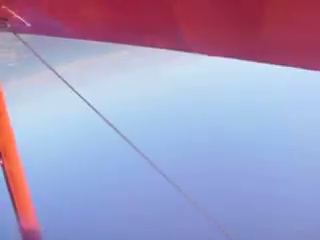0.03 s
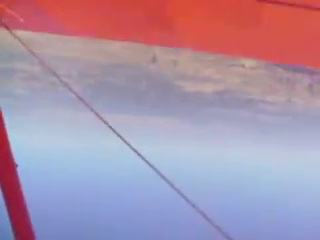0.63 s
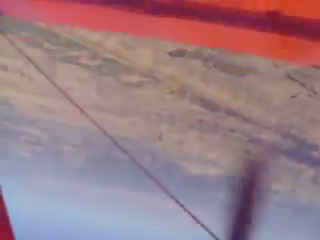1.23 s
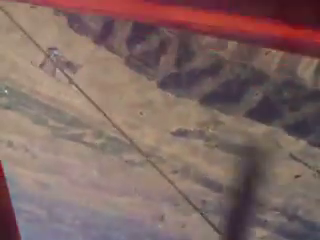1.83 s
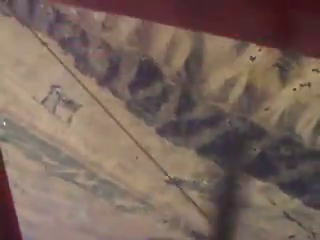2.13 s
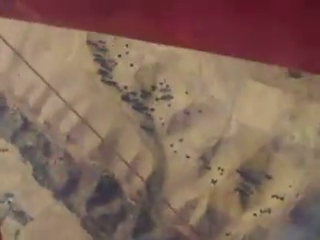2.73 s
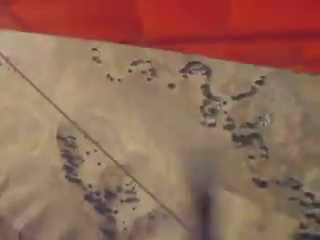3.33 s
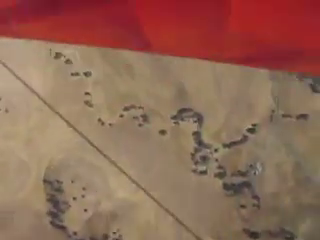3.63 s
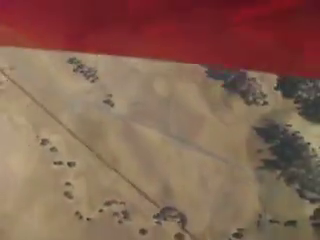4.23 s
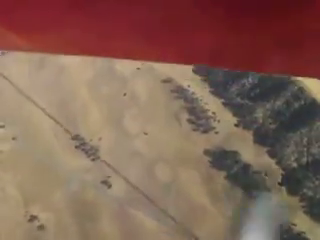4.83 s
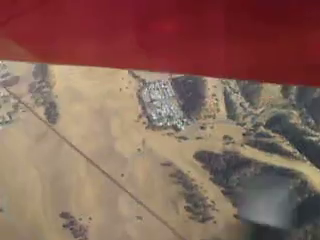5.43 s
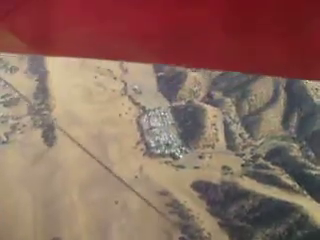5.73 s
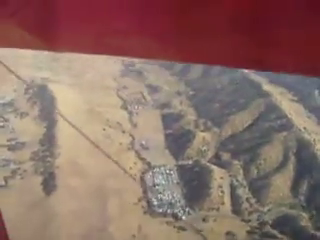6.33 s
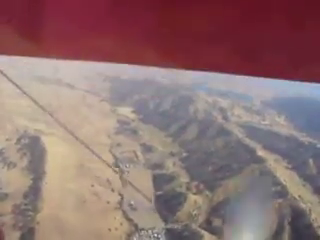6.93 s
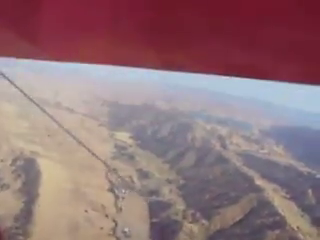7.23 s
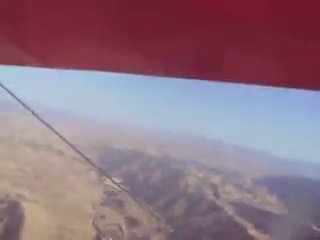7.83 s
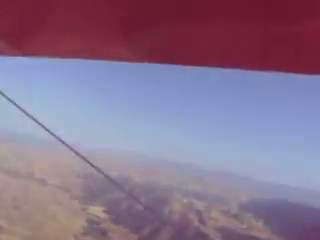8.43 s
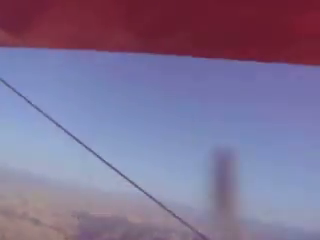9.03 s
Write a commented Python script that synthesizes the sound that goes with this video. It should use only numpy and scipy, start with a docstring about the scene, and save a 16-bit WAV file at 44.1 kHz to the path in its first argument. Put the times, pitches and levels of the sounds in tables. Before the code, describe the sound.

Loud wind roars across a small microphone in the open cockpit of a diving biplane. It comes in rapid, uneven gusts, about ten a second, each swelling into a crackling, overloaded thump before the sound briefly ducks. A piston engine drones underneath at a nearly steady pitch. As the plane gathers speed, the wind grows fuller and brighter and the exhaust rasp sinks into it.

```python
"""Wind roars and thumps on a small microphone, about ten gusts a second, in a diving open-cockpit biplane.
Each gust swells until it crackles and overloads with a thump; then the sound ducks and recovers.
The piston engine drones underneath, its exhaust rasp sinking into a slipstream that pulses
at the firing rate and brightens with airspeed."""
import sys
import numpy as np
from scipy.fft import rfft, irfft, next_fast_len
from scipy.io import wavfile
from scipy.ndimage import uniform_filter1d, map_coordinates

SR = 44100
rng = np.random.default_rng(int(sys.argv[2]) if len(sys.argv) > 2 else 0)


def file_out(sig):
    """Save sig as 16-bit WAV at sys.argv[1]."""
    # one column per channel
    cols = np.atleast_2d(sig).T
    # limit, then scale
    lim = np.clip(cols, -1, 1)
    pcm = np.round(lim * 32767).astype(np.int16)
    wavfile.write(sys.argv[1], SR, pcm)


N = 401310

# Dive, 0 = over the top, 1 = pulling out: (time [s], airspeed [0..1])
AIRSPEED = [(0, 0.32), (1.8, 0.016), (2.8, 0.2), (5.2, 0.54), (6.5, 0.79), (7.8, 1), (9.1, 0.93)]
# Crankshaft: (time [s], speed [rev/s])
SHAFT_RPS = [(1.7, 40.3), (2.4, 41.6), (3.1, 41.2), (6.6, 41.65), (8.7, 39.9)]
# Drone tones: (time [s], relative level [dB])
FIRING_DB = [(.3, -2), (.8, -5), (1.4, 1.5), (2.9, -7), (3.8, -4), (4.8, -2.5), (5.8, -7.5), (7.4, -9),
             (8.8, -11.5)]
OCTAVE_DB = [(.3, -3), (.9, -1.5), (1.4, -3.5), (1.9, -10), (3, -12), (3.8, -4.5), (4.4, -12.5), (5.8, -2),
             (6.8, -8), (8.8, -20.5)]
ORDER_5_DB = [(0, -27.5), (6.599, -27), (8.4, -7.5), (9.1, -11)]
ORDER_6_DB = [(.3, -20.5), (1.3, -1.5), (1.9, -13.5), (3.6, -20.5), (4.6, -12), (5.7, -18.5), (7.3, -10.5),
              (9.1, -12.5)]
WHINE_DB = [(.3, -13), (1.5, -8), (2.201, -16.5), (9.1, -24)]
# Exhaust overtones: (shaft order, relative level [dB])
RASP_ORDERS_DB = [(7, -6), (8, 1.5), (9, -1.5), (10, -3.5), (12, -6), (14, -7), (15, -2.5), (16.5, -9),
                  (18, -6), (20, -6.5)]
# Wind spectra: (frequency [Hz], relative density [dB])
RUMBLE_SPECTRUM_DB = [(10, -25), (25, -18.5), (50, -9), (120, 1.5), (170, -2), (260, -16.5), (600, -56.5)]
BOOM_SPECTRUM_DB = [(70, -31.5), (150, -5.5), (215, 1.5), (300, -2.5), (400, -3.5), (500, -5.5), (700, -23),
                    (2000, -62)]
RUSH_SPECTRUM_DB = [(200, -25), (400, -12.5), (530, -3.5), (620, 1.5), (680, 0.5), (750, -0.5), (850, -0.2),
                    (1000, -4.5), (1300, -11.5), (1800, -28.5), (4000, -63.5)]
HISS_SPECTRUM_DB = [(700, -31.5), (1300, 4.5), (1700, 0.7), (2100, 1), (2500, 2), (2750, 1.5), (2900, 3.5),
                    (3050, 0), (3400, -4.5), (3900, -4.5), (4500, -13.5)]
# Wind layers: (time [s], relative level [dB])
RUMBLE_DB = [(.3, -30.5), (1.8, -15), (2.3, -3.5), (2.9, -9), (3.8, -18), (4.3, -9), (5.5, -19.5),
             (7.2, -16), (9.1, -15.5)]
RUSH_DB = [(0, -6), (1.7, -6), (3.2, -3.7), (4.6, -4.5), (5.8, -5), (6.8, -4.5), (9.1, -4.5)]
# Gusts: (thump time [s], thump height [0..1], hold before thump [s], relative top level [dB])
GUSTS = [(0.1604, 0.52, 0.0035, -13.5), (0.2107, 0.9, 0.017, -15.5), (0.3085, 0.93, 0.0, -9),
         (0.4286, 0.93, 0.021, -14), (0.5404, 0.78, 0.0031, -16), (0.6257, 0.94, 0.006, -12),
         (0.7487, 0.94, 0.018, -14), (0.8715, 0.78, 0.0059, -13.5), (0.945, 0.54, 0.026, -14),
         (1.0317, 0.94, 0.022, -12.5), (1.153, 0.93, 0.0049, -11.0), (1.2763, 0.94, 0.011, -17),
         (1.3984, 0.83, 0.0053, -13.5), (1.497, 0.92, 0.0059, -17), (1.5957, 0.94, 0, -13.5),
         (1.706, 0.94, 0.0059, -10.5), (1.8287, 0.64, 0.0013, -10), (1.9155, 0.66, 0.018, -16),
         (1.989, 0.41, 0.0042, -14.5), (2.0617, 0.75, 0.004, -10.5), (2.1364, 0.83, 0.011, -15.5),
         (2.2457, 0.67, 0.018, -14), (2.3187, 0.61, 0.013, -15), (2.4029, 0.99, 0.022, -14.0),
         (2.56, 0.94, 0.041, -14.5), (2.6586, 0.86, 0.0011, -10), (2.7435, 0.6, 0.018, -14),
         (2.7757, 0.8, 0.02, -14), (2.8539, 0.61, 0.0045, -10.5), (2.898, 0.57, 0.016, -12.5),
         (2.9844, 0.68, 0.038, -16), (3.021, 0.73, 0.012, -12.5), (3.1145, 0.65, 0.023, -13.5),
         (3.1537, 0.7, 0.019, -18.5), (3.2227, 0.93, 0.011, -12), (3.3304, 0.92, 0.01, -14),
         (3.4255, 0.94, 0.025, -14), (3.535, 0.69, 0.006, -13.0), (3.6046, 0.68, 0.051, -16),
         (3.653, 0.79, 0.019, -17), (3.7246, 0.63, 0.0, -9.5), (3.808, 0.94, 0.012, -11.5),
         (3.894, 0.52, 0.0081, -13), (3.9406, 0.47, 0.012, -17.5), (3.9862, 0.46, 0.0, -10.5),
         (4.049, 0.47, 0.028, -17), (4.095, 0.93, 0.034, -16.5), (4.1761, 0.94, 0.0066, -13.5),
         (4.2882, 0.93, 0, -10.5), (4.3748, 0.63, 0.011, -13.5), (4.4675, 0.93, 0.037, -15.5),
         (4.5633, 0.65, 0.0063, -13), (4.638, 0.55, 0.018, -18.0), (4.6856, 0.72, 0.019, -14),
         (4.7685, 0.6, 0.0063, -12.5), (4.8534, 0.79, 0.012, -13.0), (4.9295, 0.14, 0.02, -17.5),
         (4.9834, 0.74, 0.04, -16.5), (5.0545, 0.61, 0.0, -10.5), (5.1087, 0.58, 0.047, -15.5),
         (5.1742, 0.75, 0.016, -14.0), (5.2834, 0.94, 0.016, -13), (5.4397, 1, 0.05, -13.5),
         (5.5203, 0.66, 0.0044, -15.5), (5.6058, 0.78, 0.048, -15.5), (5.676, 0.94, 0.016, -15),
         (5.7978, 0.76, 0.0085, -14.5), (5.861, 0.55, 0.016, -12.5), (5.942, 0.93, 0.026, -14),
         (6.039, 0.83, 0.0037, -11), (6.17, 0.94, 0.035, -15.5), (6.2703, 0.87, 0.002, -14.0),
         (6.3743, 0.62, 0.026, -15.5), (6.4163, 0.45, 0.006, -15), (6.483, 0.93, 0.03, -13),
         (6.5935, 0.6, 0.028, -14.0), (6.6388, 0.8, 0.03, -13), (6.8217, 0.58, 0.13, -14.5),
         (6.8908, 0.87, 0.058, -14.5), (6.9992, 0.7, 0.023, -14), (7.0618, 0.94, 0.011, -12.5),
         (7.181, 0.56, 0.012, -13.5), (7.2293, 0.28, 0.015, -11.5), (7.2634, 0.64, 0.0084, -16.5),
         (7.339, 0.92, 0.019, -12.5), (7.4606, 0.36, 0.039, -14), (7.506, 0.74, 0.016, -10.5),
         (7.585, 0.44, 0.014, -15), (7.7019, 0.83, 0.108, -14.5), (7.7822, 0.75, 0, -14.5),
         (7.8424, 0.61, 0.046, -12.5), (7.899, 0.7, 0.0091, -12.5), (7.956, 0.48, 0.008, -17.0),
         (7.9854, 0.97, 0.022, -11), (8.1556, 0.77, 0.0057, -9.5), (8.217, 0.74, 0.0083, -13.5),
         (8.3173, 0.56, 0.028, -13.5), (8.3766, 0.84, 0.048, -12), (8.499, 0.69, 0.048, -13.5),
         (8.567, 0.73, 0.0037, -16.0), (8.6523, 0.58, 0.064, -15), (8.7152, 0.91, 0.048, -16.5),
         (8.812, 0.89, 0.038, -13), (8.8634, 0.3, 0.0, -23.5), (8.9692, 0.85, 0.068, -12),
         (9.0546, 0.52, 0.0044, -13.0), (9.11, 0, 0.016, -8)]
# Stage after the clipper: (frequency [Hz], gain [dB])
OUTPUT_RESPONSE_DB = [(20, -3), (50, -3.5), (80, -0.5), (4300, 0.5), (5000, -7), (6300, -5), (8000, 0),
                      (10000, -5.5), (13000, -6.5), (16000, -3)]

# (level at airspeed 0 [dB], level at airspeed 1 [dB])
RASP_DB, HISS_DB = (-13, -22.5), (-17, -11)
BOOM_DB = (-4.2, 0.4)  # relative to the rush
LULL_DB = (-25.5, -18.5)  # roar between gusts, before ducking

START_S = .072
TIME_S = np.arange(N) / SR


def amp(db):
    """Decibels to gain."""
    return 10 ** (np.asarray(db) / 20)


def unit(x):
    """Scale to rms 1."""
    return x / np.sqrt(np.mean(x ** 2) + 1e-20)


def curve(rows):
    """(time [s], value) rows to one value per sample."""
    return np.interp(TIME_S, *np.transpose(rows))


def with_airspeed(levels_db):
    """Slow-to-fast level blend along the dive."""
    slow_db, fast_db = levels_db
    return slow_db + (fast_db - slow_db) * curve(AIRSPEED)


def wobble(rate_hz):
    """Smooth random curve, rate_hz knots a second."""
    knots = rng.standard_normal(int(N * rate_hz / SR) + 4)
    return map_coordinates(knots, [np.arange(N) * rate_hz / SR])


def filtered(x, response):
    """Zero-phase filter with gain response(hz)."""
    size = next_fast_len(N + 8192)
    return irfft(rfft(x, size) * response(np.fft.rfftfreq(size, 1 / SR)), size)[:N]


def colour(x, spectrum):
    """Shape x by (frequency [Hz], gain [dB]) points on a log-frequency axis."""
    points_hz, db = np.transpose(spectrum)
    return filtered(x, lambda hz: amp(np.interp(np.log(hz + 1), np.log(points_hz), db)))


def noise(spectrum):
    """Coloured noise, rms 1."""
    return unit(colour(rng.standard_normal(N), spectrum))


def gust_index():
    """Per sample, the row of the gust building up."""
    thump_s = np.transpose(GUSTS)[0]
    return np.minimum(np.searchsorted(thump_s, TIME_S), len(GUSTS) - 1)


def engine(shaft_rad, rasp_waver_db, drone_waver_db):
    """A few shaft orders drone; the other exhaust overtones waver in the turbulent air."""
    def tone(order):
        phase_rad = order * shaft_rad + rng.uniform(0, 2 * np.pi)
        return np.sqrt(2) * np.sin(phase_rad + order * wobble(5) / 70)

    levels = {2: FIRING_DB, 4: OCTAVE_DB, 5: ORDER_5_DB, 6: ORDER_6_DB, 16: WHINE_DB}
    drone = sum(amp(curve(rows) + drone_waver_db * wobble(4.4)) * tone(order)
                for order, rows in levels.items())
    # a four-stroke repeats every two turns, so half orders occur
    rasp = sum(amp(db + rasp_waver_db * wobble(1.9)) * tone(order) for order, db in RASP_ORDERS_DB)
    return drone + amp(with_airspeed(RASP_DB)) * rasp


def slipstream(shaft_rad, pulse_depth, eddy_db):
    """Wind; all but the rumble pulses at the engine's firing rate and flutters with quick eddies."""
    firing_pulse = 1 + pulse_depth * np.cos(2 * shaft_rad)
    chop = unit(firing_pulse * amp(eddy_db * wobble(110)))
    body = noise(RUSH_SPECTRUM_DB) + amp(with_airspeed(BOOM_DB)) * noise(BOOM_SPECTRUM_DB)
    hiss = amp(with_airspeed(HISS_DB)) * noise(HISS_SPECTRUM_DB)
    rumble = amp(curve(RUMBLE_DB)) * noise(RUMBLE_SPECTRUM_DB)
    return rumble + chop * (amp(curve(RUSH_DB)) * body + hiss)


def gust_gain(duck_db, creep_share, swell_power, lift_db, flutter_db, top_flutter_db, smooth_s):
    """The level ducks deeper after harder thumps, creeps back, then races to the next gust's top."""
    thump_s, height, hold_s, top_db = np.transpose(GUSTS)
    start_s, last_height = np.r_[START_S, thump_s[:-1]], np.r_[1, height[:-1]]
    rise_s = np.maximum(thump_s - hold_s - start_s, 1e-3)
    k = gust_index()
    progress = np.clip((TIME_S - start_s[k]) / rise_s[k], 0, 1)
    swell = creep_share * progress + (1 - creep_share) * progress ** swell_power
    low_db = with_airspeed(LULL_DB) - duck_db * last_height[k]
    level_db = low_db + (top_db[k] + lift_db - low_db) * swell
    level_db += (flutter_db + top_flutter_db * swell) * wobble(70)
    return amp(uniform_filter1d(level_db, int(smooth_s * SR)))


def air_tear(gain_db, rise_s):
    """Air rips across the microphone: hiss peaking at each thump."""
    thump_s, height, *_ = np.transpose(GUSTS)
    k = gust_index()
    envelope = height[k] * np.exp(-np.abs(thump_s[k] - TIME_S) / rise_s)
    return amp(gain_db) * envelope * noise(HISS_SPECTRUM_DB)


def soft_overload(x, limit, order):
    """Large positive swings saturate, rounding their tops."""
    return x / (1 + (np.maximum(x, 0) / limit) ** order) ** (1 / order)


def overload_thumps(sound, attack_s, decay_s, undershoot, lead_s, overshoot_db):
    """A hard gust overloads: a negative swing, then a positive pulse that briefly replaces the roar."""
    out = sound.copy()
    t_s = np.arange(-SR // 100, SR // 100) / SR
    dip = undershoot * np.exp(-(0.79 * (t_s + lead_s) / lead_s) ** 2)
    for (thump_s, height, *_), depth in zip(GUSTS, rng.uniform(0.56, 1.5, len(GUSTS))):
        first = round(thump_s * SR) - len(t_s) // 2
        if height > .2 and first + len(t_s) < N:
            # higher thump: steeper front, slower return
            front = np.exp(-(t_s * height / attack_s) ** 2)
            tail = np.exp(-np.abs(t_s / (decay_s * height)) ** 1.32)
            thump = np.where(t_s < 0, front, tail)
            span = slice(first, first + len(t_s))
            dipped = out[span] - depth * height * dip
            out[span] = dipped * (1 - thump) + amp(overshoot_db) * height * thump
    return out


def scene():
    """Engine and wind at the buffeted microphone."""
    shaft_rad = 2 * np.pi * np.cumsum(curve(SHAFT_RPS)) / SR
    roar = engine(shaft_rad, rasp_waver_db=2.0, drone_waver_db=.7)
    roar += slipstream(shaft_rad, pulse_depth=0.17, eddy_db=1.35)
    roar *= gust_gain(duck_db=5.5, creep_share=0.26, swell_power=5.04, lift_db=0.56,
                      flutter_db=.5, top_flutter_db=1.01, smooth_s=0.00028)
    roar += air_tear(gain_db=-15, rise_s=.0017)
    rounded = soft_overload(roar, limit=0.8, order=4)
    return overload_thumps(rounded, attack_s=0.00027, decay_s=0.0012,
                           undershoot=0.28, lead_s=0.0016, overshoot_db=0.67)[None]


def record(dry):
    """Narrow-band input; the off-centre converter clips one side early and spits treble."""
    band_hz, band_order, top_hz = 3950, 22, 15900
    offset, clip_level = -.2335, .715
    narrow = filtered(dry[0], lambda hz: 1 / np.sqrt(1 + (hz / band_hz) ** (2 * band_order)))
    clipped = np.clip(narrow + offset, -clip_level, clip_level) - offset
    output = filtered(colour(clipped, OUTPUT_RESPONSE_DB), lambda hz: hz < top_hz) + offset
    fade_in = np.clip((TIME_S - START_S) / .004, 0, 1)
    return (fade_in * output)[None]


dry = scene()
out = record(dry)
file_out(out)
```